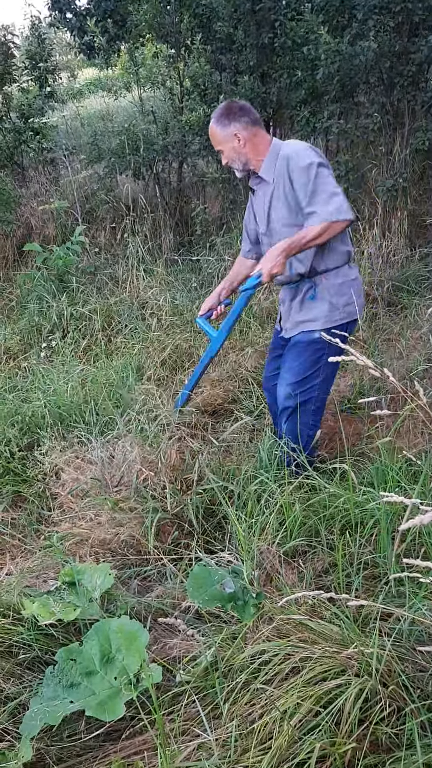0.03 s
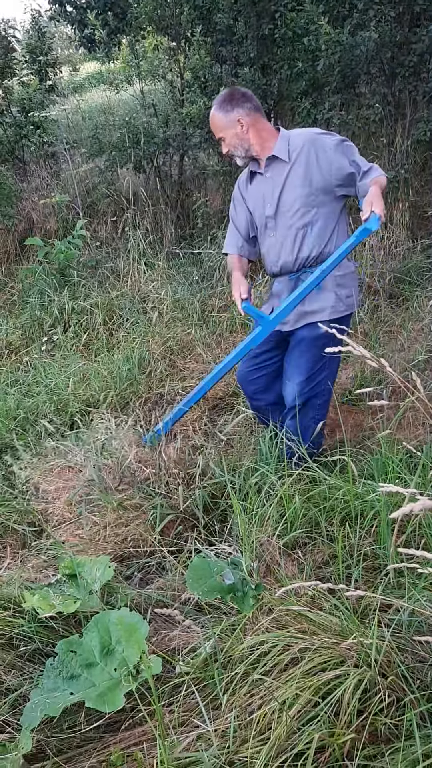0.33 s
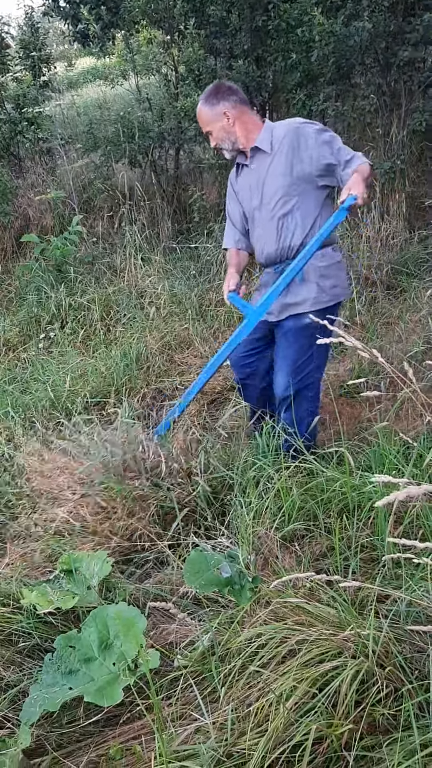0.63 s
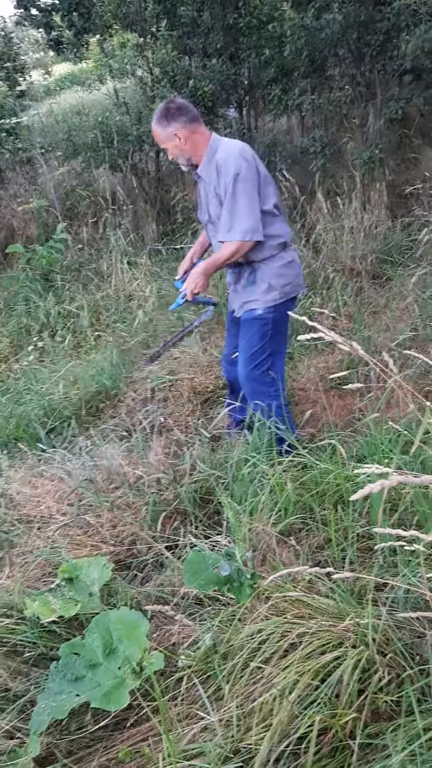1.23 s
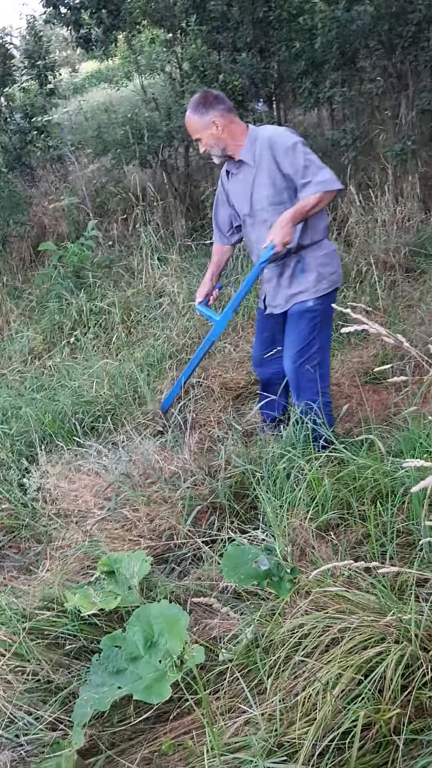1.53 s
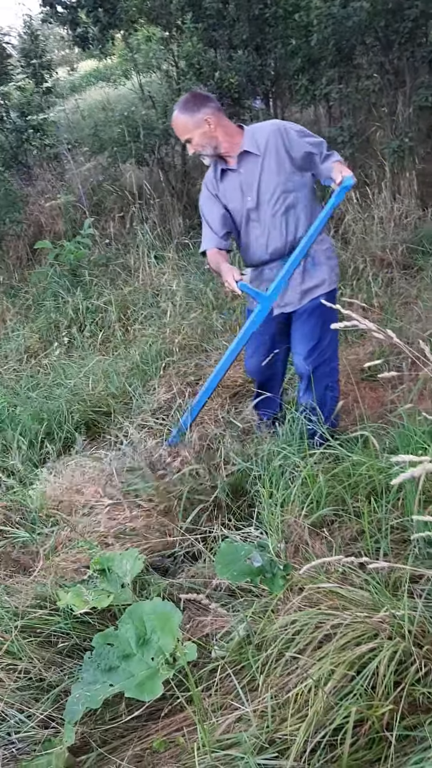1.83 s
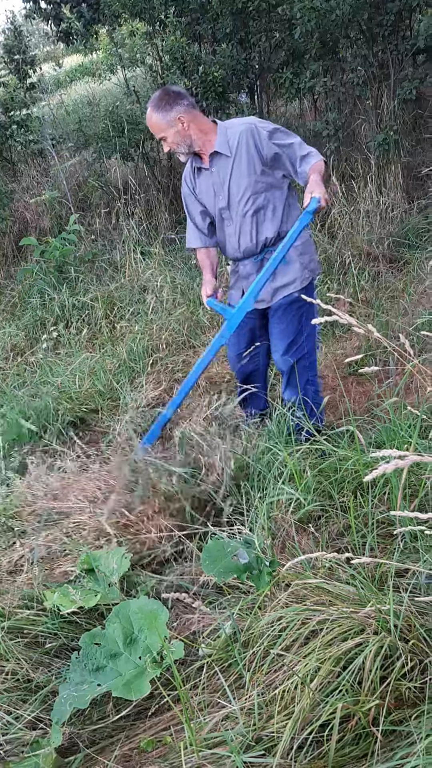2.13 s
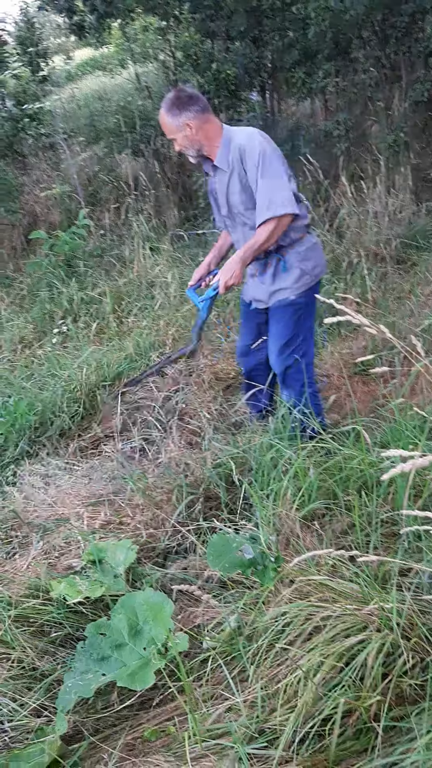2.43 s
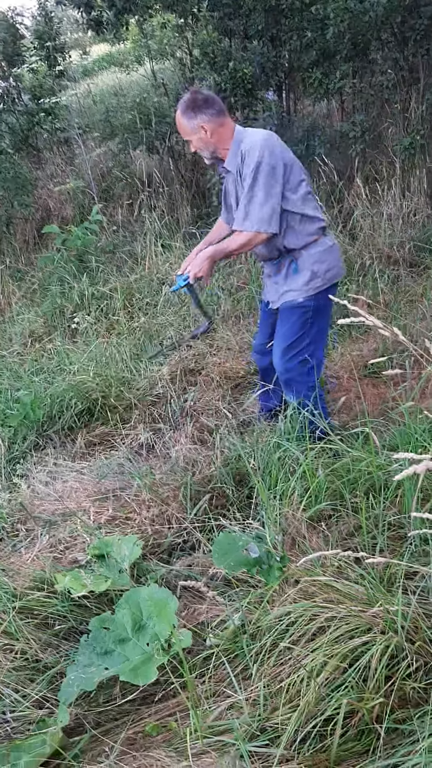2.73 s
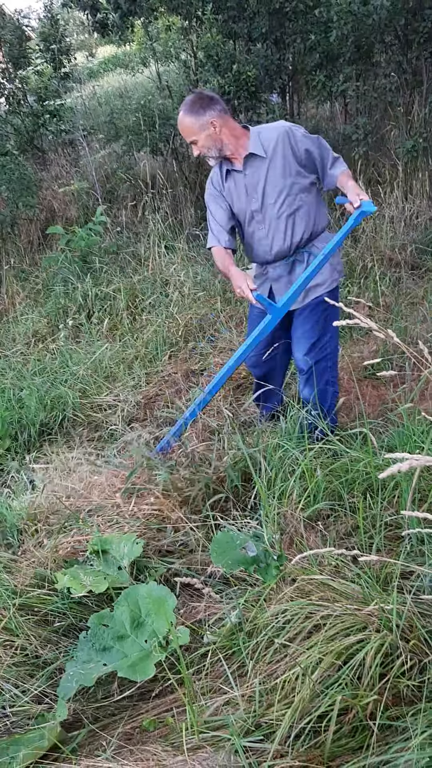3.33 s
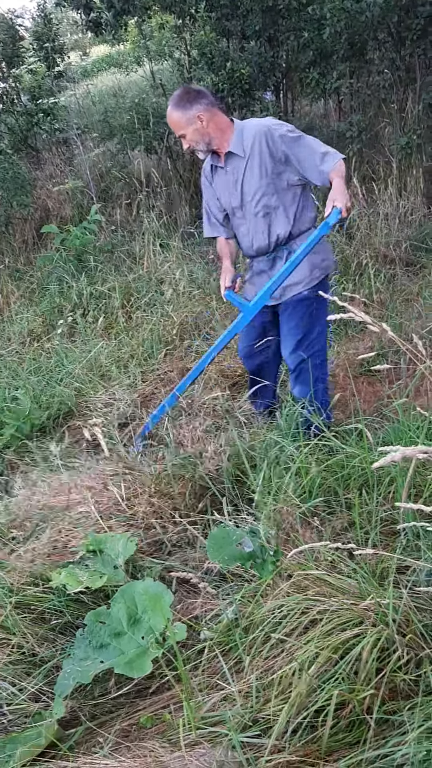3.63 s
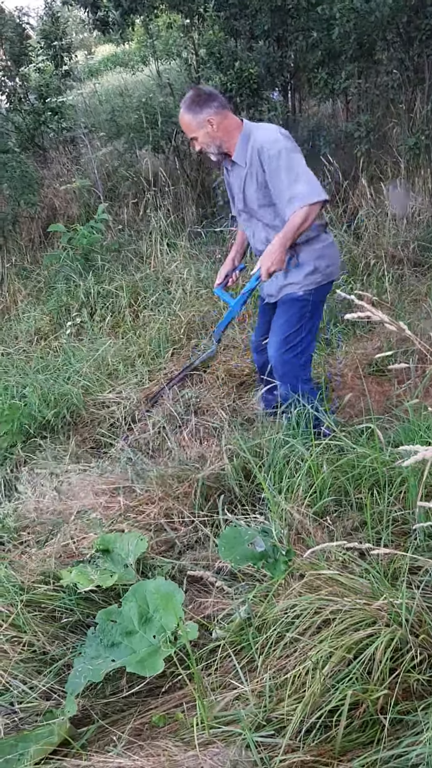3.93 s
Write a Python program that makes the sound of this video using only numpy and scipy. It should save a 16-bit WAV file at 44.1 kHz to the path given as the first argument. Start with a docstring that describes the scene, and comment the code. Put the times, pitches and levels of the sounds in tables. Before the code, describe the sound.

A scythe swishes through tall grass in three crisp strokes, with dry rustling between.

```python
"""A scythe mows tall grass a few metres away: three cuts, each followed by a lighter drag over the stubble.
Breaking stalks and friction excite the resonances of the steel blade, whose rasp rises through the cut
and falls on the way back. Dry grass rustles throughout, and green stems squeak by stick-slip motion.
The mower shifts his feet and turns the shaft with soft knocks; a bird whistles faintly on the left."""
import sys
import numpy as np
from scipy import signal
from scipy.fft import rfft, irfft, next_fast_len
from scipy.io import wavfile
from scipy.ndimage import uniform_filter1d, map_coordinates

SR = 44100
rng = np.random.default_rng(int(sys.argv[2]) if len(sys.argv) > 2 else 0)


def to_wav(sig):
    """Store sig (one row per channel, or 1-D mono) as 16-bit WAV at the path in sys.argv[1].

    Samples outside -1..1 are clipped; the rate is SR.
    """
    pcm = np.clip(np.atleast_2d(sig), -1, 1) * 32767
    pcm = np.round(pcm).astype(np.int16)
    wavfile.write(sys.argv[1], SR, pcm.T)  # frames by channels


N = 176400

# Levels are relative; rise_s and fall_s span the 20 dB on either side of a peak.
# amount of grass in motion: time_s, level_db
RUSTLE_LEVELS = [(0.0, -41), (0.46, -47.5), (0.6, -55), (1.08, -47), (1.34, -60), (1.4, -50),
                 (1.472, -44.5), (1.495, -41.5), (1.59, -42), (1.66, -39.5), (2.12, -52.5), (2.23, -46),
                 (2.44, -47), (2.75, -63), (2.901, -40), (3.11, -40), (3.16, -47.5), (3.27, -45.5),
                 (3.48, -54), (3.85, -48.5), (3.91, -52), (4.0, -55)]
# bite of the edge and push on the swath, one table a stroke: time_s, bite_db, push_db
CUT_STROKES = [
    [(0.0, -50, -57), (0.018, -45, -60), (0.094, -63, -49.5), (0.262, -38.5, -57), (0.27, -34.5, -58),
     (0.34, -46, -87), (0.42, -54.5, -70), (0.594, -67, -75)],
    [(1.465, -51, -78), (1.495, -45, -66), (1.622, -44.5, -44), (1.644, -48, -46.5), (1.686, -28.5, -41),
     (1.716, -37.5, -50), (1.886, -53.5, -63), (2.07, -64, -77)],
    [(2.825, -67.5, -95), (2.884, -41.5, -68), (2.922, -46, -48.5), (3.042, -38, -45.5),
     (3.12, -29.5, -43.5), (3.16, -52.5, -54.5), (3.268, -39.5, -53), (3.286, -50.5, -56), (3.5, -58, -65)],
]
# sliding contacts of the blade: peak_s, level_db, centre_hz, rise_s, fall_s
FORWARD_RASPS = [(0.27, -52.5, 2000, 0.25, 0.27), (1.68, -51, 1580, 0.23, 0.25),
                 (3.112, -36, 2100, 0.068, 0.096)]
DRAG_RASPS = [(0.82, -47.5, 2650, 0.2, 0.19), (2.25, -45, 2300, 0.15, 0.15), (3.675, -49, 2480, 0.17, 0.15)]  # its back drawn over the stubble
LIFT_RASPS = [(0.98, -50, 3880, 0.17, 0.096), (1.102, -41.5, 4400, 0.044, 0.04),
              (3.875, -44.5, 4600, 0.03, 0.085)]  # stubble sliding off as it lifts
# heel thumps and shaft knocks: peak_s, pitch_hz, level_db, fall_s
HEEL_AND_SHAFT_KNOCKS = [(0.068, 130, -56, 0.02), (1.293, 712, -56, 0.012), (1.367, 410, -62, 0.0094),
                         (1.447, 105, -56.5, 0.019), (3.447, 780, -53.5, 0.011)]
# swells of friction noise: peak_s, level_db, rise_s, fall_s
STUBBLE_BRUSHES = [(0.1, -43, 0.079, 0.21), (1.0, -50, 0.56, 0.41), (1.67, -41.5, 0.13, 0.17),
                   (2.23, -47.5, 0.26, 0.43), (2.47, -50.5, 0.058, 0.19), (3.12, -49, 0.023, 0.076),
                   (3.19, -44, 0.059, 0.11), (3.63, -49, 0.18, 0.16), (3.85, -49.5, 0.24, 0.28)]
BOOT_SCUFFS = [(1.03, -62, 0.39, 0.29), (1.3, -64.5, 0.22, 0.15), (2.0, -60.5, 0.47, 0.22),
               (3.9, -65.5, 0.081, 0.53)]
SEED_FLICKS = [(1.055, -45.5, .003, 0.018), (1.07, -52, .004, 0.038), (2.56, -55.5, 0.11, 0.078),
               (3.79, -51, 0.0097, 0.068), (3.865, -51, 0.03, 0.05), (3.937, -49.5, 0.0077, 0.06)]
# thick stalks breaking: peak_s, level_db, fall_s
STALK_SNAPS = [(0.272, -40, 0.021), (0.423, -43.5, .006), (0.448, -43.5, 0.0062), (1.291, -51.5, 0.014),
               (1.494, -38, 0.014), (1.648, -29, 0.022), (1.67, -31, 0.0036), (1.68, -34, .012),
               (1.872, -45, .003), (2.215, -47, 0.018), (2.266, -45, 0.0089), (2.959, -33, 0.014),
               (3.061, -41, 0.0044), (3.115, -33.5, 0.027), (3.135, -44, .012), (3.174, -36, 0.0095)]
# bird whistles: start_s, length_s, start_hz, end_hz, level_db
BIRD_NOTES = [(0.655, 0.04, 2380, 2320, -55), (1.224, 0.033, 2580, 1900, -55),
              (1.336, 0.052, 3160, 3010, -51.5), (1.38, .042, 3230, 2900, -50),
              (1.41, .04, 2880, 2980, -52), (1.987, 0.081, 2920, 2730, -55.5)]
# green stems on the steel: peak_s, pitch_hz, level_db
STEM_SQUEAKS = [(1.725, 1640, -41), (2.26, 2490, -43), (3.685, 2570, -47.5), (3.77, 1342, -55.5),
                (3.81, 3300, -50), (3.94, 7030, -53.5)]
# resonances of the blade: frequency_hz, bandwidth_hz, gain_db
BLADE_MODES = [(241, 50, -6), (739, 60, -5), (903, 25, -7), (1061, 45, -9), (1325, 35, -4), (1630, 40, -1),
               (1783, 60, -9), (2011, 42, -7), (2342, 35, -4), (2681, 30, -3), (3242, 45, -4),
               (3800, 45, 0), (3990, 70, -2), (4517, 40, -5)]
# spectral envelopes of the sources: frequency_hz, gain_db
AIR_SPECTRUM = [(25, -21), (70, 2), (130, 3.5), (250, -6), (600, -9), (1500, -5), (4000, -20), (15000, -4)]
LEAF_SPECTRUM = [(300, -21), (1000, -22), (2200, -13), (3200, -3), (4400, 3.5), (5400, -5), (7200, -5.5),
                 (8700, -11.5), (10500, -0.5), (12400, 2), (14000, -1), (16000, -4.5)]
STEM_SPECTRUM = [(1000, -25), (2200, -15.5), (2750, -6.5), (4000, -7.5), (5200, -16)]
EDGE_SPECTRUM = [(200, -42), (600, -8.5), (1000, -2.5), (1600, 4), (2600, -1.5), (4400, 0), (5500, -9),
                 (9000, -22), (15000, -53)]
SWATH_SPECTRUM = [(30, -60), (120, -6), (230, -2), (430, 0.5), (750, 1.5), (1100, 0.5), (2000, -3),
                  (5000, -59)]
STUBBLE_SPECTRUM = [(400, -21), (1100, -9.5), (1600, 0), (2200, -6), (3000, 1.5), (3800, 3.5), (4700, 2.5),
                    (5500, -6), (7200, -11.5), (9000, -15), (15000, -16)]
# likeness of left and right: frequency_hz, correlation
STEREO_CORRELATION = [(50, -0.2), (130, 0.75), (700, 0.8), (1500, 0.72), (2500, 0.27), (4000, .5),
                      (7000, -0.04), (12000, 0)]
# stereo balance: frequency_hz, left_minus_right_db
STEREO_BALANCE = [(100, -3), (1200, -2), (2000, -2), (2700, -4), (3500, -11), (4300, -6), (5400, 0),
                  (7000, 10.5), (9000, -1), (12000, -9), (15500, 0.5)]


def amp(db):
    """Amplitude ratio of a level in decibels."""
    return 10 ** (np.asarray(db) / 20)


def unit(x):
    """Normalisation to rms 1."""
    return x / np.sqrt(np.mean(x ** 2) + 1e-20)


def along(points, hz):
    """Interpolation of (frequency_hz, value) points on a logarithmic frequency axis."""
    frequencies, values = np.transpose(points)
    return np.interp(np.log(hz + 1), np.log(frequencies + 1), values)


def clock():
    """Sample times in seconds."""
    return np.arange(N) / SR


def wobble(knots_per_s):
    """Random modulation: a smooth curve through Gaussian values."""
    return map_coordinates(rng.standard_normal(4096), [clock() * knots_per_s], mode="wrap")


def patches(shape, bins, frames):
    """Random spectral modulation: a field of rms 1, smoothed over frequency and time."""
    return unit(uniform_filter1d(uniform_filter1d(rng.standard_normal(shape), bins, 0), frames, 1))


def swell(peak_s, rise_s, fall_s):
    """Amplitude envelope, 20 dB down at rise_s before its peak and fall_s after."""
    t = clock() - peak_s
    return amp(-20 * np.abs(t / np.where(t < 0, rise_s, fall_s)) ** 1.6)


def swells(events):
    """Superposition of envelopes, each at its own level."""
    return sum(amp(db) * swell(peak_s, rise_s, fall_s) for peak_s, db, rise_s, fall_s in events)


def filtered(x, response):
    """Linear filtering: the spectrum is multiplied by a frequency response."""
    size = next_fast_len(N + SR // 4)
    return irfft(rfft(x, size) * response(np.fft.rfftfreq(size, 1 / SR)), size)[..., :N]


def crackle(per_s, spread_db, rub):
    """Shot noise: two trains of random fibre breaks over a smooth rubbing noise."""
    breaks = (rng.random((2, N)) < per_s / SR) * rng.choice([-1, 1], (2, N))
    sizes = amp(spread_db * np.minimum(rng.exponential(size=(2, N)), 4))
    return unit(breaks * sizes) + rub * rng.standard_normal((2, N))


def blade(direct):
    """Modal response of the steel: damped resonators in parallel with a direct path."""
    return lambda hz: direct + sum(amp(db) * 1j * hz * width / (mode_hz ** 2 - hz ** 2 + 1j * hz * width)
                                   for mode_hz, width, db in BLADE_MODES)


def voiced(pair, spectrum, body=np.ones_like):
    """Source-filter model: two excitations are coloured, then mixed as mid (rms 1) and side."""
    def response(hz):
        angle = np.arccos(np.clip(along(STEREO_CORRELATION, hz), -1, 1)) / 2
        return amp(along(spectrum, hz)) * body(hz) * np.array([np.ones_like(hz), np.tan(angle)])
    mid, side = filtered(pair, response)
    return np.array([mid + side, mid - side]) / np.std(mid)


def outdoor_air():
    """Stationary broadband noise: the faint background of still air."""
    return amp(-66) * voiced(rng.standard_normal((2, N)), AIR_SPECTRUM)


def rustle():
    """Dry friction: leaves rub together, and with more movement the stiffer stems join in."""
    stem_onset_db = -52.5
    level_db = np.interp(clock(), *np.transpose(RUSTLE_LEVELS)) + 0.97 * wobble(45)
    leaves = voiced(crackle(per_s=5000, spread_db=2.5, rub=0.68), LEAF_SPECTRUM)
    stems = voiced(crackle(per_s=2500, spread_db=2.5, rub=0.35), STEM_SPECTRUM, blade(direct=2.7))
    stem_gain = amp(-2) / (1 + amp(stem_onset_db - level_db) ** 2)
    return amp(level_db) * (leaves + stem_gain * stems)


def cuts():
    """Shear fracture: the edge severs clumps of stalks, ringing the blade, and pushes the swath aside."""
    fade_db_per_s = 132
    t, bite, push = clock(), np.zeros(N), np.zeros(N)
    for stroke in CUT_STROKES:
        times, bite_db, push_db = np.transpose(stroke)
        outside_s = np.abs(t - np.clip(t, times[0], times[-1]))
        bite += amp(np.interp(t, times, bite_db) - fade_db_per_s * outside_s)
        push += amp(np.interp(t, times, push_db) - fade_db_per_s * outside_s)
    stalks = crackle(per_s=1500, spread_db=2.5, rub=0.45) * amp(2 * wobble(160))
    edge = voiced(stalks, EDGE_SPECTRUM, blade(direct=0.63))
    swath = voiced(crackle(per_s=900, spread_db=0.5, rub=0.9), SWATH_SPECTRUM, blade(direct=0.34))
    return bite * (amp(-5.5) * edge + amp(-7) * splits()) + amp(-2) * push * swath


def splits(per_s=260, centre_hz=2870, range_oct=1.8, spread_db=12, ring_cycles=22):
    """Damped oscillation: single stalks part with tiny pitched cracks, placed by phase; rms 1."""
    when, size, pitch, place = rng.random((4, int(per_s * N / SR)))
    pitch_hz = centre_hz * 2 ** (range_oct * (pitch - 0.5))
    age = np.arange(256)
    cycles = pitch_hz[:, None] * age / SR
    envelopes = amp(spread_db * size ** 2)[:, None] * amp(-60 * cycles / ring_cycles)
    samples = ((when * N).astype(int)[:, None] + age).ravel()
    phase_lag = np.pi * (place[:, None] - 0.5)
    pair = []
    for side in (0.5, -0.5):
        cracks = envelopes * np.sin(2 * np.pi * cycles + side * phase_lag)
        pair.append(np.bincount(samples, cracks.ravel(), N)[:N])
    return unit(filtered(np.array(pair), lambda hz: hz ** 2 / (hz ** 2 + (centre_hz / 2) ** 2)))


def rasp(passes, glide_oct_per_s, width_oct, rough_db, squeak_db, direct):
    """Sliding friction: a band of scraping noise glides as the contact travels along the blade."""
    grit = crackle(per_s=2500, spread_db=5, rub=0.46) * amp(rough_db * wobble(200))
    scrape = voiced(grit, [(200, 12), (6000, -9)], blade(direct))
    hz, t, spectra = signal.stft(scrape, SR, nperseg=512)
    spectra = spectra * amp(squeak_db * patches(spectra.shape[1:], bins=2, frames=6))  # stems squeak
    out = np.zeros((2, N))
    for peak_s, db, centre_hz, rise_s, fall_s in passes:
        centre_oct = np.log2(centre_hz) + np.clip(glide_oct_per_s * (t - peak_s), -1.6, 0.8)
        band = np.exp(-0.5 * ((np.log2(hz + 1)[:, None] - centre_oct) / width_oct) ** 2)
        gliding = signal.istft(spectra * band, nperseg=512)[1][:, :N]
        out += amp(db) * swell(peak_s, rise_s, fall_s) * unit(gliding)
    return out


def knocks(rise_s=0.009):
    """Heavily damped vibration: heels thump and the turning shaft knocks, a few cycles each."""
    out = np.zeros(N)
    for peak_s, hz, db, fall_s in HEEL_AND_SHAFT_KNOCKS:
        phase = 2 * np.pi * np.cumsum(hz * (1 + 0.05 * wobble(150))) / SR
        out += amp(db) * swell(peak_s, rise_s, fall_s) * np.sin(phase)
    return out


def brushes():
    """Frictional excitation: stiff stubble sweeps over the flat of the blade."""
    stems = crackle(per_s=4000, spread_db=1, rub=0.6) * amp(0.76 * wobble(130))
    spectra = signal.stft(stems, nperseg=1024)[2]
    flicker = amp(6.2 * patches(spectra.shape[1:], bins=2, frames=2))
    stems = signal.istft(spectra * flicker, nperseg=1024)[1][:, :N]
    return swells(STUBBLE_BRUSHES) * voiced(stems, STUBBLE_SPECTRUM, blade(direct=1))


def snaps():
    """Fracture: a thick stalk gives way in a burst of breaking fibres that rings the blade."""
    envelope = swells((peak_s, db, 0.45 * fall_s, fall_s) for peak_s, db, fall_s in STALK_SNAPS)
    spectrum = [(200, -32), (800, -4.5), (1600, 5), (4200, 6), (5800, -16), (15000, -0.5)]
    return envelope * voiced(rng.standard_normal((2, N)), spectrum, blade(direct=0.94))


def bird(reverb_s=0.75):
    """Gliding whistles from the left, blurred by reverberation among the trees."""
    song = np.zeros(N)
    for start_s, length_s, start_hz, end_hz, db in BIRD_NOTES:
        progress = np.clip((clock() - start_s) / length_s, 0, 1)
        pitch_hz = (start_hz + (end_hz - start_hz) * progress) * (1 + 0.016 * wobble(260))
        song += amp(db) * np.sin(np.pi * progress) * np.sin(2 * np.pi * np.cumsum(pitch_hz) / SR)
    t = np.arange(SR // 2) / SR
    tail = rng.standard_normal((2, len(t))) * amp(-60 * t / reverb_s)
    echo = signal.fftconvolve(song[None], tail / np.linalg.norm(tail[0]), axes=1)[:, :N]
    return (song + amp(-7) * echo) * amp([[6], [-4]])


def steps():
    """Friction noise: a boot scuffs the matted grass."""
    spectrum = [(100, -36), (350, 8.5), (750, 3.5), (1300, -1.5), (3000, 6), (8000, -51)]
    return swells(BOOT_SCUFFS) * voiced(crackle(per_s=270, spread_db=2.5, rub=0.75), spectrum)


def flicks():
    """Light impacts: dry seed heads on the steel give a thin, bright scratch."""
    spectrum = [(2000, -23), (4500, -17), (5800, 3), (6900, 7.5), (9000, 8), (12000, 6.5), (15000, 0)]
    return swells(SEED_FLICKS) * voiced(crackle(per_s=2800, spread_db=-4.5, rub=0.95), spectrum)


def squeaks(half_length_s=0.042, waver=0.0208):
    """Stick-slip oscillation: a juicy stem on the blade sounds a brief, wavering tone."""
    out = np.zeros((2, N))
    for peak_s, hz, db in STEM_SQUEAKS:
        phase = 2 * np.pi * np.cumsum(hz * (1 + waver * wobble(350))) / SR
        channel_phase = rng.normal(0, 0.53, (2, 1))
        envelope = amp(db + 3.4 * wobble(250)) * swell(peak_s, half_length_s, half_length_s)
        out += envelope * np.sin(phase + channel_phase)
    return out


def scene():
    """Superposition: mowing and air lie a little to the right, the bird to the left."""
    air = outdoor_air()
    forward = rasp(FORWARD_RASPS, glide_oct_per_s=11, width_oct=0.48,
                   rough_db=-1, squeak_db=-0.5, direct=0.24)
    back = rasp(DRAG_RASPS, glide_oct_per_s=-6.5, width_oct=0.52, rough_db=2, squeak_db=3, direct=0.8)
    lift = rasp(LIFT_RASPS, glide_oct_per_s=2.7, width_oct=0.14, rough_db=2, squeak_db=6, direct=1.5)
    mowing = rustle() + cuts() + forward + back + lift + brushes() + flicks() + squeaks() + snaps()
    mower = steps() + knocks()
    balance = lambda hz: amp(along(STEREO_BALANCE, hz) * np.array([[0.5], [-0.5]]))
    return filtered(mowing + mower + air, balance) + bird()


def record(dry):
    """Band limiting: a second-order high-pass thins the bass; a sharp cutoff ends the treble."""
    low_cut_hz, top_hz = 48, 15800
    return filtered(dry, lambda hz: (hz < top_hz) * hz ** 2 / np.hypot(hz ** 2, low_cut_hz ** 2))


dry = scene()
out = record(dry)
to_wav(out)
```